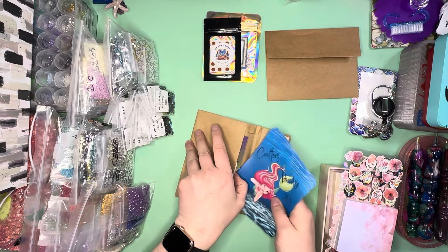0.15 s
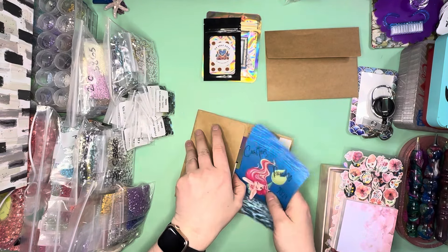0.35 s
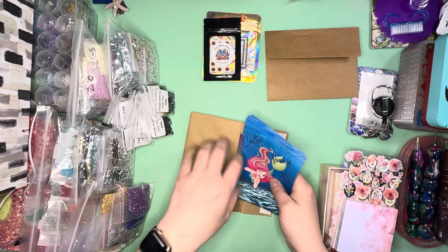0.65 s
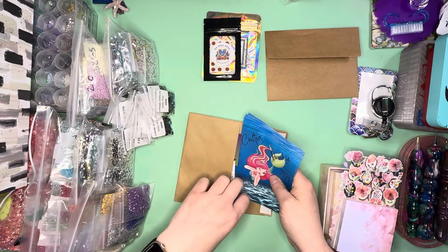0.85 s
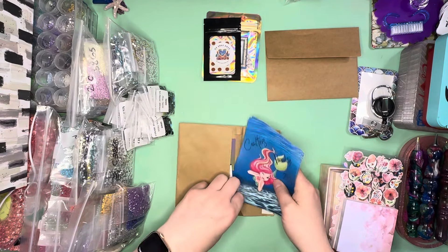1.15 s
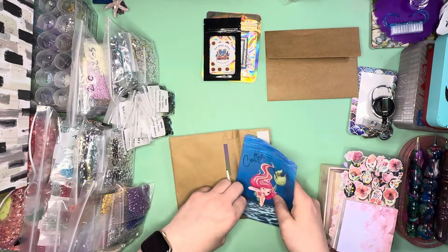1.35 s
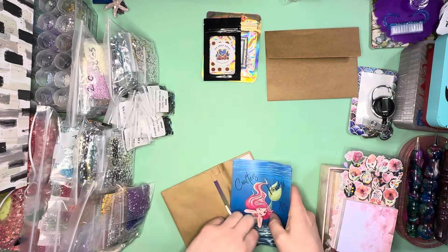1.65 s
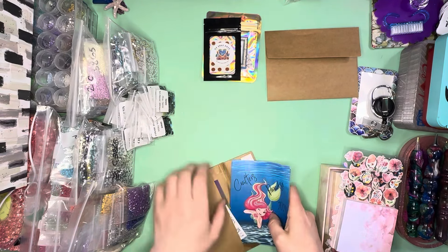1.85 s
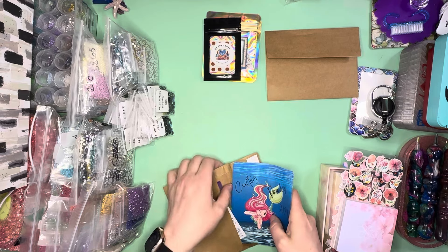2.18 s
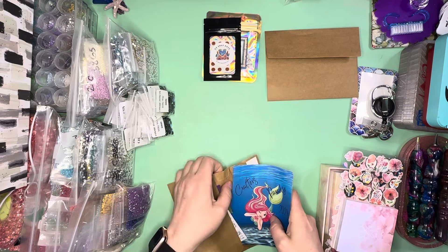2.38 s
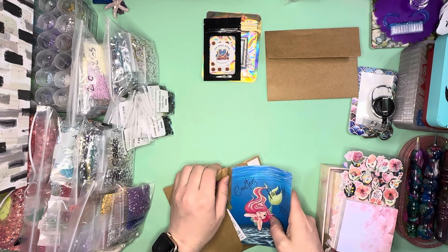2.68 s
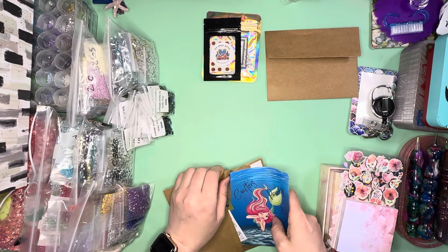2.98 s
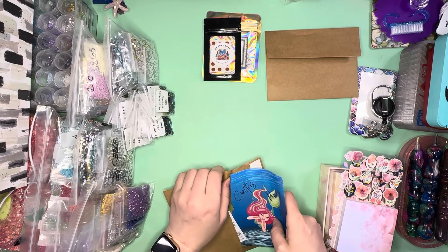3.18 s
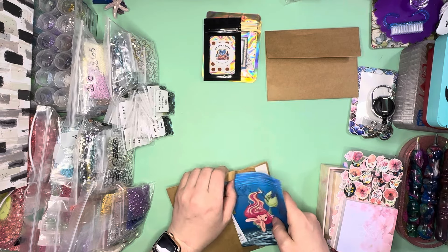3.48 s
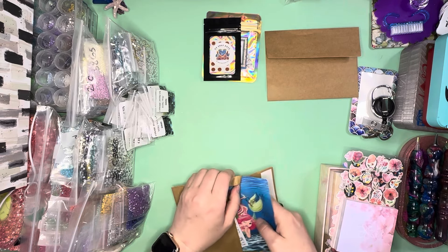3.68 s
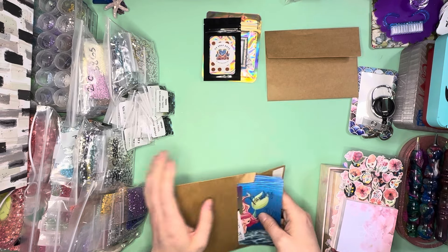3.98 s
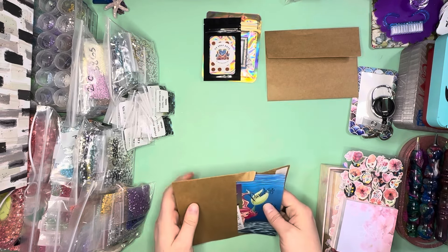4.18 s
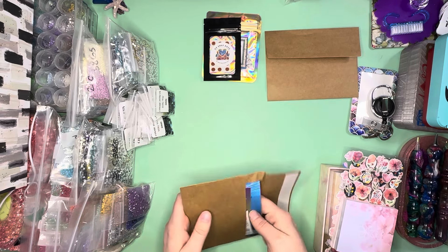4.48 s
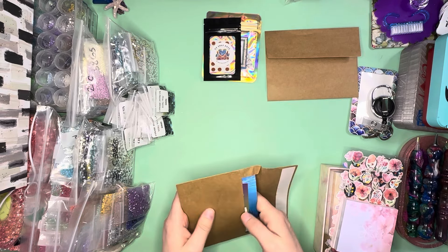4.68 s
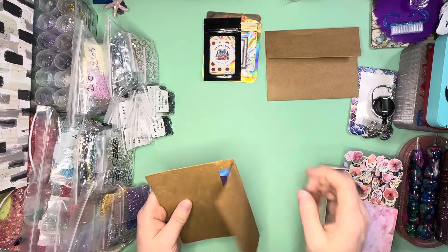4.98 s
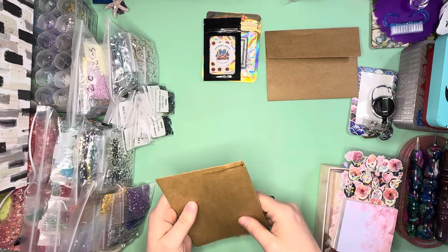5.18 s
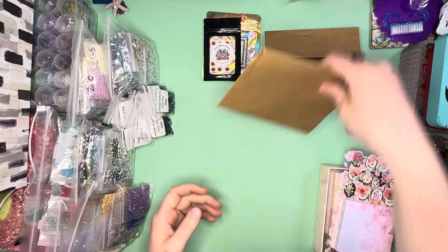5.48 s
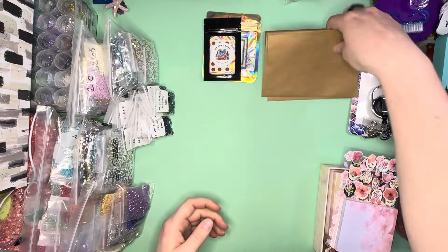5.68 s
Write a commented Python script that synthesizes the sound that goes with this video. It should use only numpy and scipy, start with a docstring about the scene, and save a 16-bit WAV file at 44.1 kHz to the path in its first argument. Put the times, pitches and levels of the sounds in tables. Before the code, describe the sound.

A quiet indoor desk scene, heard closely in stereo with short room echoes. A steady, slightly wavering low machine hum with soft rumble and faint hiss runs throughout. From 0 to 1.4 seconds, stiff paper cards rub an envelope in brief dry strokes, with a small crackle at 0.5 and a crisp tick at 1.0. A stronger raspy scrape comes at 1.5. Around 1.9 there are soft low bumps, then a snap at 2.1 and gentle papery shuffling, with a bright click at 2.8. A sharp crackling snap hits at 3.25, followed by a longer slide from 3.4 to 3.75. At 4.3 to 4.45 a swelling, ringing scrape ends in the loudest pop and hollow knock. More rubs and dull flaps follow at 4.65 to 4.9, a small thud at 5.1, then fading rustles and light placing taps around 5.65 to 5.8.

```python
"""Paper sheets and a card slide by hand into a paper envelope on a desk: filtered noise in short strokes.
The card edge rasps as gliding rings, creases snap as dying noise bursts, and bumps are damped sines.
The open pocket rings along; echoes and a sparse tail give the desk and room.
A machine hums in wavering tones over shaped-noise rumble and hiss, all under a two-port microphone."""
import sys
import numpy as np
from scipy import signal
from scipy.fft import rfft, irfft, next_fast_len
from scipy.io import wavfile
from scipy.ndimage import uniform_filter1d

SR = 44100
rng = np.random.default_rng(int(sys.argv[2]) if len(sys.argv) > 2 else 0)


def pcm_store(signal):
    """Save signal as 16-bit PCM."""
    levels = np.round(np.clip(np.atleast_2d(signal), -1, 1) * 32767)
    wavfile.write(sys.argv[1], SR, levels.astype(np.int16).T)


def voltage_ratio(level):
    """Linear amplitude factor for a level in decibels (scalar or array-like)."""
    return 10 ** (np.asarray(level, float) / 20)


N = 257981


def evened(x):
    """Scales to rms 1."""
    return x / np.sqrt(np.mean(x ** 2) + 1e-20)


def read_curve(points, hz, column=1):
    """Reads a table column on a log-frequency axis."""
    table = np.transpose(points)
    return np.interp(np.log(hz + 1), np.log(table[0] + 1), table[column])


def resonate(x, hz, width_hz):
    """One resonance of gain 1 at its centre."""
    b, a = signal.iirpeak(np.clip(hz, 20, SR / 2.2), max(hz / width_hz, .3), SR)
    return signal.lfilter(b, a, x)


def lowpass(x, order, hz):
    """Butterworth low-pass: dulls a sound above its corner."""
    return signal.lfilter(*signal.butter(order, hz, fs=SR), x)


def coloured(x, points):
    """Minimum-phase filter: gives a sound the spectrum of the table without smearing it ahead in time."""
    hz = abs(np.fft.fftfreq(4096, 1 / SR))
    log_gain = np.log(voltage_ratio(np.maximum(read_curve(points, hz), -100)))
    taps = np.fft.ifft(np.exp(np.conj(signal.hilbert(log_gain)))).real[:2048]
    return signal.oaconvolve(x, taps)[:len(x)]


# Strokes of paper on paper: t/s, length/s, rubbing level/dB, brightness/dB, swell over the stroke/dB
PAPER_STROKES = [(0.0, 0.022, -53, 2.5, -4), (0.053, .16, -48.5, -0.5, -11), (0.25, 0.21, -53, -2.5, 0.5),
                 (0.504, 0.05, -51, 4, 0), (0.613, 0.033, -53.5, 3.5, -1), (0.776, 0.081, -48, -6.5, 5.5),
                 (.915, 0.052, -51.5, 1.5, -4), (1.021, 0.048, -53.5, 2.5, -6), (1.112, 0.14, -54, 4, -4.5),
                 (1.269, 0.063, -49.5, 1, 2), (1.367, .07, -56.5, 3, -2), (1.471, 0.13, -42.5, -2.5, 3.5),
                 (1.632, 0.044, -53, 2, 12), (1.893, 0.18, -57.5, 1.5, 10.5),
                 (2.114, 0.15, -52.5, -3, -1.5), (2.311, .18, -52, 0.5, -11),
                 (2.525, 0.14, -54, -1.5, -5.5), (2.688, .04, -50.5, -0.5, -8.5),
                 (2.794, 0.26, -53, -4.5, 0.5), (3.186, 0.051, -53, -3.5, 9),
                 (3.249, 0.072, -51.5, 2.5, -14), (3.348, 0.058, -54, -6, 7), (3.429, 0.33, -45, -1, -1.5),
                 (3.795, 0.14, -48.5, -0.5, -0.5), (3.973, 0.26, -52.5, -2.5, 4),
                 (4.266, 0.16, -44, 2, 13.5), (4.444, 0.017, -41.5, 1.5, 3), (4.48, 0.042, -52.5, 4, -12),
                 (4.546, .11, -53.5, -7.5, 6), (4.681, 0.035, -49, -6.5, 2), (4.725, 0.085, -42.5, -2.5, 9),
                 (4.835, 0.072, -50.5, -8, -3), (5.108, 0.019, -54, -5, -3), (5.149, 0.024, -52.5, 2, -8),
                 (5.176, .12, -57.5, -3, -6), (5.337, 0.12, -60, 2, -2), (5.539, 0.052, -63.5, 1, 0),
                 (5.666, 0.054, -54, 1.5, -7), (5.749, 0.016, -51.5, -2, -6), (5.772, 0.085, -59.5, -2, -1)]


def stroke_pressure(t):
    """Each stroke rises, swells or fades, and stops; gives rubbing, fibre hiss and flexing in dB."""
    attack_db_per_s, release_db_per_s = 1000, 598
    flex_db, flex_per_bright = -1.65, -0.5  # dull strokes flex the whole sheet more
    start, length, db, bright_db, swell_db = np.transpose(PAPER_STROKES)[:, :, None]
    age = t - start
    rub_db = db + swell_db * (np.clip(age / length, 0, 1) - .5)
    rub_db = rub_db + attack_db_per_s * np.minimum(age, 0)
    rub_db = rub_db - release_db_per_s * np.maximum(age - length, 0)
    hiss_db = rub_db + bright_db
    sheet_db = rub_db + flex_db + flex_per_bright * bright_db
    return [20 * np.log10(voltage_ratio(layer).sum(0) + 1e-9) for layer in (rub_db, hiss_db, sheet_db)]


# Spectrum of rubbed paper: f/Hz, level/dB per Hz
PAPER_SPECTRUM = [(120, -39), (260, -5.5), (750, -12), (1350, -2), (1850, -5), (2450, -5.5), (3600, -9),
                  (4800, -6), (6000, -8), (9200, -6), (13500, -17), (16000, -17)]


def scrape(ticks_per_s=500, tick_db=-9, spread_db=3.0, patchy_db=3.0, clump_db=2.0):
    """Fibres catch and slip: dense noise with small ticks that come in clumps, shaped by each stroke."""
    sizes = voltage_ratio(spread_db * np.minimum(rng.exponential(1, N), 4))
    ticks = sizes * (rng.random(N) < ticks_per_s / SR)
    clumps = evened(uniform_filter1d(rng.standard_normal(N), size=600))
    ticks = ticks * voltage_ratio(clump_db * clumps)
    drive = rng.standard_normal(N) + voltage_ratio(tick_db) * evened(ticks * rng.standard_normal(N))
    hz, t, z = signal.stft(evened(coloured(drive, PAPER_SPECTRUM)), SR, nperseg=256, noverlap=192)

    rub_db, hiss_db, flex_db = stroke_pressure(t)
    high = np.clip(np.log2((hz + 1) / 3400) / 0.62, 0, 1)[:, None]  # share of the fibre hiss
    low = np.clip(np.log2(1800 / (hz + 1)) / 0.46, 0, 1)[:, None]  # share of the flexing sheet
    patches = uniform_filter1d(rng.standard_normal(z.shape[::-1]), 24, 0)  # smooth in time
    patches = evened(uniform_filter1d(patches, 4, 1)).T  # and in frequency
    field_db = (1 - high - low) * rub_db + high * hiss_db + low * flex_db + patchy_db * patches
    return signal.istft(z * voltage_ratio(field_db), SR, nperseg=256, noverlap=192)[1][:N]


def broad_rubbing():
    """Sheets rub over a broad area, unlike in each port: a second, dulled scrape in opposite phase."""
    return voltage_ratio(-7.0) * np.array([[1], [-1]]) * lowpass(scrape(), 4, 7500)


# Card edge along the flap, ringing it as it slides: t/s, ring f/Hz, level/dB
EDGE_GLIDE = [(0, 1400, -20), (.06, 1400, 0.5), (.17, 1450, -2), (.22, 1450, -20), (.33, 2700, -18),
              (.39, 2700, 6), (.47, 2900, -20), (.75, 2000, -20), (.83, 2000, -2), (.9, 2000, -20),
              (1.44, 2400, -20), (1.5, 2420, 5), (1.62, 2000, -9), (1.66, 2000, -25), (3.4, 2480, -18),
              (3.5, 2500, -7), (3.9, 2500, -9), (4.26, 2450, -10), (4.295, 2540, 5), (4.36, 2600, 6),
              (4.39, 2700, -1), (4.45, 2600, -3), (4.47, 2600, -20)]


def rasp(x):
    """Adds to the rubbing a gliding ring of the flap and its overtone, both driven by it."""
    width_hz, overtone, overtone_db = 220, 2.35, -3
    s, hz, db = np.transpose(EDGE_GLIDE)
    t = np.arange(N) / SR
    r = np.exp(-np.pi * width_hz / SR)
    out = x
    for multiple, share_db in ((1, 0), (overtone, overtone_db)):
        # shift the ring to 0 Hz, smooth there, shift back: a resonance that can glide
        turn = np.exp(2j * np.pi * multiple * np.cumsum(np.interp(t, s, hz)) / SR)
        ring = 2 * (turn * signal.lfilter([1 - r], [1, -r], x / turn)).real
        out = out + voltage_ratio(np.interp(t, s, db) + share_db) * ring
    return out


# How strongly the pocket rings as it is held open and filled: t/s, level/dB
POCKET_OPENING = [(0, -6), (.5, -20), (1.5, -15), (2.1, -8), (3, -5), (3.6, -17), (4.2, -27), (4.35, -7),
                  (4.44, -10), (4.74, -17), (4.81, -5), (5.1, -28), (5.85, -20)]
# Rings of the envelope pocket: f/Hz, width/Hz, level/dB
POCKET_RINGS = [(1230, 52, 5.5), (1390, 28, -2), (2000, 28, -6), (2100, 49, 0), (2420, 60, -1.5),
                (2560, 250, -1.5)]


def envelope_pocket(paper):
    """The envelope's hollow resonates with the paper sounds, more or less as its opening changes."""
    inside = paper * voltage_ratio(np.interp(np.arange(N) / SR, *np.transpose(POCKET_OPENING)))
    return paper + sum(voltage_ratio(db) * resonate(inside, hz, width_hz) for hz, width_hz, db in POCKET_RINGS)


# Machine tones: f/Hz, rms level before the microphone/dB, width of the waver/Hz
HUM_TONES = [(38.4, -57.5, 2), (59.75, -51.5, 1.5), (118.5, -49.5, 1.6)]


def machine_hum(waver=0.48):
    """Steady tones; narrow noise around each makes its strength and phase waver a little."""
    t, out = np.arange(N) / SR, np.zeros(N)
    for hz, db, width_hz in HUM_TONES:
        wobble = evened(resonate(rng.standard_normal(N), hz, width_hz))
        tone = np.sqrt(2) * np.sin(2 * np.pi * (hz * t + rng.random()))
        out += voltage_ratio(db) * evened(tone + waver * wobble)
    return out


# Spectrum of the room air: f/Hz, relative level/dB per Hz
AIR_SPECTRUM = [(20, -14), (38, -10), (100, -3.5), (150, -7), (200, -16.5), (330, -24.5), (600, -21.5),
                (900, -27.5), (1400, -22.5), (2800, -35), (6200, -36.5), (8400, -45), (13500, -51.5),
                (16000, -57)]
# How alike the air is in both ports: f/Hz, left-right likeness (1 = the same)
AIR_LIKENESS = [(60, 0.97), (130, 0.97), (290, 0.62), (640, 0.091), (3000, 0.13), (7500, 0.18),
                (15000, 0.38)]


def room_air():
    """Rumble and hiss as faintly patchy noise, much alike in both ports only in the bass."""
    level_db, patchy_db = -48.5, 1.8
    frames, hz = N // 512 + 5, np.fft.rfftfreq(2048, 1 / SR)
    a, b, c, d, patches = rng.standard_normal((frames, 1025, 5)).T
    patches = evened(uniform_filter1d(uniform_filter1d(patches, 12, 0), 6, 1))
    same = np.clip(read_curve(AIR_LIKENESS, hz), -1, 1)[:, None]
    left = a + 1j * b
    right = same * left + np.sqrt(1 - same ** 2) * (c + 1j * d)
    z = np.array([left, right]) * voltage_ratio(read_curve(AIR_SPECTRUM, hz)[:, None] + patchy_db * patches)
    return voltage_ratio(level_db) * evened(signal.istft(z, nperseg=2048, noverlap=1536)[1][:, :N])


# Single echoes: left t/ms, right t/ms, level before dulling/dB
FIRST_ECHOES = [(1.2, 1.487, -8.5), (3.1, 2.6, -11), (7.1, 7.1, -8.5), (11.5, 11, -7.5), (17, 19, -10.5)]
# Tail of the room: f/Hz, t60/s, relative level/dB
ROOM_TAIL = [(250, 0.6, 1), (1500, 0.44, -2), (2600, 0.36, -6), (5550, 0.24, 6), (8000, 0.37, -7),
             (14000, .1, -14)]


def desk_and_room(x, tail_db=-12.5, dull_hz=4500):
    """Direct sound, a few single dull echoes, and a sparse decaying tail that differs per port."""
    taps = np.zeros((2, SR // 2))
    at = np.arange(300, SR // 2 - 20, 20) + rng.integers(0, 20, (2, (SR // 2 - 301) // 20))
    np.put_along_axis(taps, at, rng.choice([-1., 1.], at.shape), 1)
    hz, t, z = signal.stft(taps, SR, nperseg=256)
    decay_db = read_curve(ROOM_TAIL, hz, column=2)[:, None] - 60 * t / read_curve(ROOM_TAIL, hz)[:, None]
    response = signal.istft(z * voltage_ratio(decay_db), SR, nperseg=256)[1]
    response *= voltage_ratio(tail_db) / np.linalg.norm(response[0])
    echoes = np.zeros_like(response)
    for left_ms, right_ms, db in FIRST_ECHOES:
        echoes[[0, 1], [round(left_ms * SR / 1000), round(right_ms * SR / 1000)]] += voltage_ratio(db)
    response += lowpass(echoes, 1, dull_hz)
    response[:, 0] += 1  # direct sound
    return signal.fftconvolve(x, response, axes=1)[:, :N]


# Creases buckle, edges hit: t/s, peak level before pocket and room/dB, ring f/Hz,
# crispness/dB, left-right of ring and slap/dB
CREASE_SNAPS = [(.056, -39, 1500, -14, -2), (.097, -36, 1290, -14, 0), (.352, -39, 1700, -10, 0),
                (.518, -33, 2600, 3, 2), (0.528, -30.5, 2540, 5, 2), (0.763, -43, 1560, -16, -5),
                (0.818, -31.5, 2000, -1, -2), (.826, -32.5, 2060, -18, -2), (1.022, -23, 1880, 12.5, 0),
                (1.294, -24, 5400, -4, 12), (2.103, -20, 1500, -3, 4), (2.112, -31, 1500, -22, 2),
                (1.466, -38, 2100, -14, 0), (1.52, -31, 1700, -14, -3), (1.568, -32, 2300, -8, 0),
                (1.585, -34, 4700, -10, 0), (2.211, -34.5, 1400, -12, 1), (2.238, -39, 1080, -17, 0),
                (2.397, -34, 2000, -18, 0), (2.682, -32.5, 1670, -2, -1), (2.69, -31.5, 2300, -4, -2),
                (2.79, -19.5, 8900, -1.5, 8), (3.228, -26, 2420, 0, 3), (3.246, -14, 1700, 4, 0.5),
                (3.252, -22.5, 4640, -8, -6), (3.255, -30, 1360, -5, 0), (3.261, -29, 4400, -6, 2),
                (3.268, -26, 5200, -5, -2), (3.272, -35, 1050, -10, 0), (3.282, -32, 4800, -7, -2),
                (3.298, -38, 5000, -4, -2), (3.314, -39, 5200, -6, 0), (3.576, -39, 1400, -14, 0),
                (3.585, -26, 1500, -10, 0), (3.668, -34, 2000, -13, 0), (3.733, -32, 1550, -14, 3),
                (3.8, -29, 1600, -22, 0), (3.905, -38, 2600, 1, 0), (4.378, -29, 3000, -8, 0),
                (4.412, -25, 2450, -16, 2), (4.453, -31, 2600, -8, 2), (4.461, -8.5, 2600, -28, -1),
                (4.469, -23, 2070, -22, 1), (4.662, -30, 1920, -22, 0), (4.667, -22, 1900, -23, 2),
                (4.73, -27.5, 2020, -18, 4), (4.77, -29, 1250, -8.5, 0), (4.787, -28.5, 2400, -12, 2),
                (4.803, -28, 1230, -14, 0), (4.818, -19.5, 1390, -23, 0.5), (4.89, -38.5, 700, -25, 1),
                (4.954, -41, 800, -33, -1), (5.033, -37.5, 700, -37, -4), (5.106, -32.5, 1230, 0, 3),
                (5.147, -36, 6000, 10, 1), (5.658, -33.5, 2600, -2, -4), (5.659, -29.5, 920, -13, -3),
                (5.748, -38.5, 2000, -6, -4), (5.758, -41.5, 1350, -20, -6)]


def snaps(ring_q=2.43, broad_db=-1.5, rise_share=0.11, edge_hz=3500, low_hz=330, reach=1.8, reach_down=2.75):
    """Each snap is a dying burst: a damped ring of the sheet, a broad slap and a crisp edge."""
    base_t60_s, t60_s_per_crisp_db = 0.019, .0002  # crisp crumples last a little longer
    out, t = np.zeros((2, N + 4096)), np.arange(4096) / SR
    bursts = rng.standard_normal((len(CREASE_SNAPS), 3, 4096))
    edge = signal.butter(4, 3600, "high", fs=SR)
    for (s, db, hz, crisp_db, pan_db), burst in zip(CREASE_SNAPS, bursts):
        age = t / max(base_t60_s + t60_s_per_crisp_db * crisp_db, .002)
        rise = (1 - np.exp(-age / rise_share)) ** 2  # long crumples also start more softly
        burst = burst * rise * voltage_ratio(-60 * age)
        ring = evened(resonate(resonate(burst[0], hz, hz / ring_q), hz, hz / ring_q))
        band_hz = [max(low_hz, hz / reach_down), min(reach * hz, SR / 3)]
        body = signal.butter(2, band_hz, "band", fs=SR)
        slap = voltage_ratio(broad_db) * evened(signal.lfilter(*body, burst[1]))
        crisp = lowpass(signal.lfilter(*edge, burst[2]), 1, edge_hz + 2 * hz)
        crisp = voltage_ratio(crisp_db) * evened(crisp)
        sound = voltage_ratio(np.array([[.5], [-.5]]) * pan_db) * (ring + slap) + crisp
        start = round(s * SR)
        out[:, start:start + 4096] += voltage_ratio(db) * sound / abs(sound.mean(0)).max()
    return out[:, :N]


# Hands and envelope bump the desk, hollow: t/s, level before rise and decay/dB, ring f/Hz,
# swings until it has died by 60 dB
DESK_BUMPS = [(1.9, -42.5, 306, 15), (1.937, -35.5, 167, 14.5), (1.96, -40, 390, 13), (3.232, -43, 690, 22),
              (3.592, -38, 890, 18), (4.417, -34, 650, 22), (4.461, -28.5, 560, 22), (4.462, -37, 222, 15),
              (4.463, -26, 1350, 30), (4.666, -33, 672, 20), (4.73, -35, 420, 15), (4.769, -36, 290, 18),
              (4.818, -34, 600, 20), (4.89, -39, 400, 15), (4.955, -37.5, 510, 19), (5.034, -38, 535, 18),
              (5.118, -29, 407, 21), (5.661, -44, 422, 15), (5.68, -37, 400, 15), (5.755, -39, 400, 15),
              (5.779, -33.5, 135, 15)]


def bumps(rise_swings=0.68):
    """Soft low knocks: one damped mode each."""
    out, t = np.zeros(N + 8192), np.arange(8192) / SR
    for s, db, hz, swings in DESK_BUMPS:
        rise = 1 - np.exp(-hz * t / rise_swings)
        decay = voltage_ratio(db - 60 * hz * t / swings)
        out[round(s * SR):][:8192] += rise * decay * np.sin(2 * np.pi * hz * t)
    return out[:N]


def scene():
    """Paper through the envelope pocket and the room, over hum and air."""
    paper = rasp(scrape()) + broad_rubbing() + snaps() + bumps()
    handled = desk_and_room(envelope_pocket(paper))
    return voltage_ratio(1.0) * handled + machine_hum() + room_air()


def top_cut(x):
    """Nothing passes above the cut-off."""
    return signal.sosfilt(signal.butter(12, 16500, fs=SR, output="sos"), x)


# Colour of the microphone: f/Hz, level/dB
MICROPHONE_COLOUR = [(24, -30), (34, 1.5), (13700, -5.5), (14300, 6), (16300, -13), (16600, -40)]
# Phase between the ports: f/Hz, lead of the left/rad
PORT_LEAD = [(0, 0.3), (130, 0.19), (780, 0.6), (1100, 0.63), (2400, -0.6), (2900, -1.5), (4600, -2.04),
             (6500, -6), (7800, -5), (10000, -3), (11200, 0), (13200, -1.5), (14300, 4), (16000, 2.5)]
# Balance of the ports: f/Hz, left-right level/dB
PORT_LEVELS = [(60, -1), (120, -2.5), (290, -2.5), (640, -3), (1400, -5), (2400, -2), (4400, -6), (8000, 0),
               (16000, 3)]


def record(dry):
    """Microphone colour; the two ports differ in phase and level with frequency."""
    size = next_fast_len(N + 4096)
    hz = np.fft.rfftfreq(size, 1 / SR)
    # each port takes half of the difference
    half = voltage_ratio(read_curve(PORT_LEVELS, hz) / 2) * np.exp(.5j * read_curve(PORT_LEAD, hz))
    response = voltage_ratio(read_curve(MICROPHONE_COLOUR, hz)) * np.array([half, 1 / half])
    ports = irfft(rfft(dry, size) * response, size)[:, :N]
    return top_cut(ports)


dry = scene()
out = record(dry)
pcm_store(out)
```